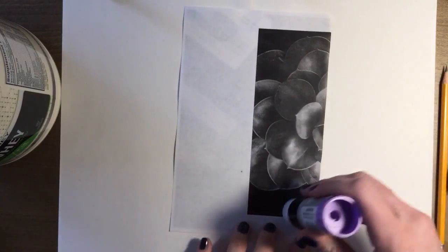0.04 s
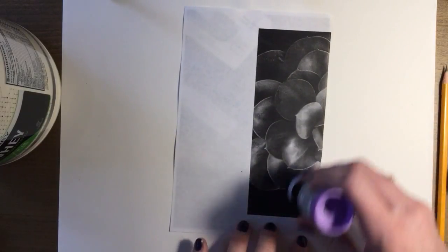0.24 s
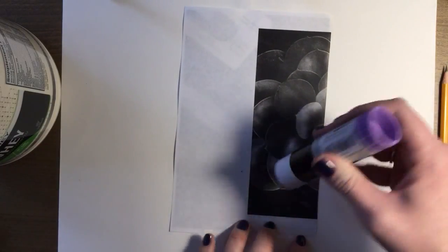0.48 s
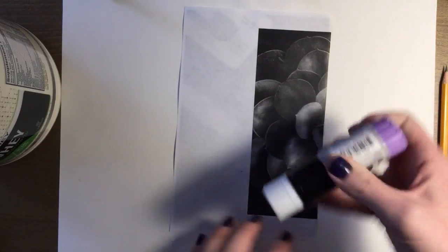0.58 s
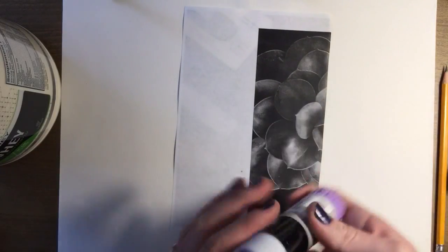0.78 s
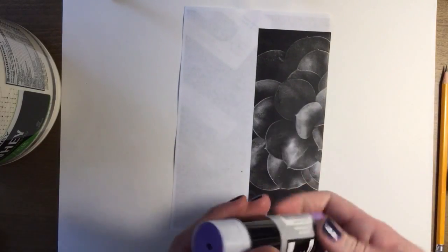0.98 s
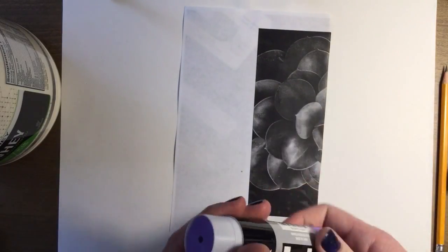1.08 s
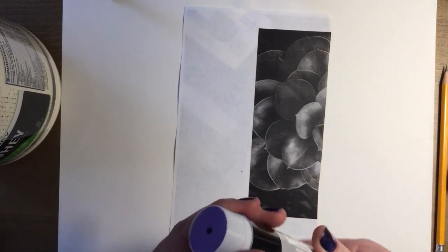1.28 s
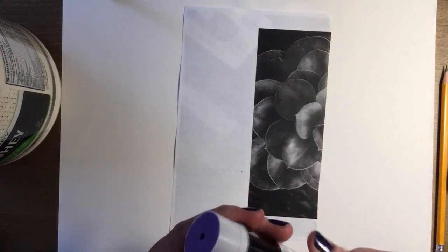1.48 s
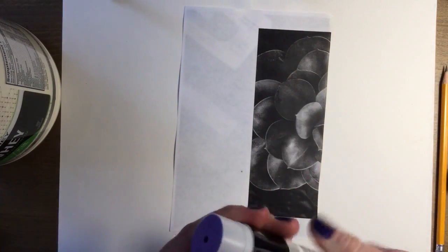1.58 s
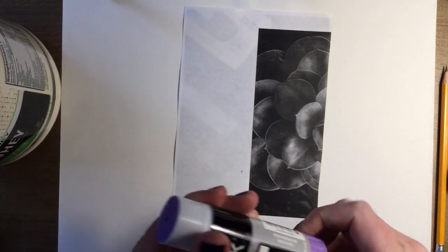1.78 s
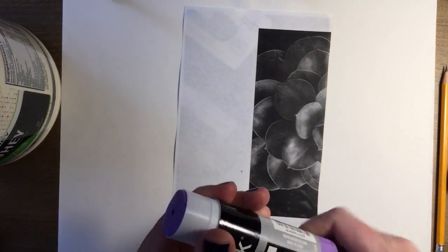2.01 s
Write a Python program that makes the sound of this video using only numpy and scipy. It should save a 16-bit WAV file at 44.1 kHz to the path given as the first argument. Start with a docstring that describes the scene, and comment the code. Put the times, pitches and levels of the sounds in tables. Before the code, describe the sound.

A glue stick bumps a desk and scrapes across paper, followed by faint handling.

```python
"""First comes a soft, dull rub, over the low rumble and mains hum of a quiet room. A glue stick bumps
a desk with a dull thump, then scrapes across a sheet of paper, its friction making the desk top rumble.
Afterwards fingers brush, tick and faintly squeak on the plastic tube as it changes hands."""
import sys
import numpy as np
from scipy import signal
from scipy.fft import rfft, irfft
from scipy.io import wavfile

SR = 44100
rng = np.random.default_rng(int(sys.argv[2]) if len(sys.argv) > 2 else 0)


def store_wav(level_fs):
    """Save 16-bit WAV to argv[1]."""
    pcm = np.round(np.clip(np.atleast_2d(level_fs), -1, 1) * 32767)
    wavfile.write(sys.argv[1], SR, pcm.T.astype(np.int16))


N = 90404
TIME = np.arange(N) / SR

# notes at which the plastic tube rings (pitch [Hz], width [Hz], boost [dB])
TUBE_NOTES = [(3233, 190, 11), (4020, 1300, 3.5), (5000, 150, 8.5)]


def from_db(db):
    """Turn decibels into a number to multiply by."""
    return 10 ** (np.asarray(db) / 20)


def rms_one(x):
    """Scale a sound so that its average strength (rms) is 1."""
    return x / np.sqrt(np.mean(x ** 2) + 1e-20)


def in_time(rows):
    """Join (time, value) rows with straight lines; outside them give -160, which in dB is silence."""
    return np.interp(TIME, *np.transpose(rows), left=-160, right=-160)


def colour(x, tone, tilt_db=0):
    """Shape a sound by (pitch, level) rows, tilted per octave and fading past the ends; strength 1."""
    hz, db = np.transpose(tone)
    octave, points = np.log2(np.fft.rfftfreq(N, 1 / SR) + 1), np.log2(hz)
    outside = np.abs(octave - np.clip(octave, points[0], points[-1]))
    gain_db = np.interp(octave, points, db) + tilt_db * octave - 20 * outside
    return rms_one(irfft(rfft(x) * from_db(gain_db), N))


def grains(per_s, spread_db):
    """Friction: tiny slips of uneven size at random moments."""
    sizes = from_db(spread_db * np.minimum(rng.exponential(1, N), 4))
    return rms_one(sizes * rng.choice([-1, 1], N) * (rng.random(N) < per_s / SR))


def stroke(start, rise, fall):
    """A smooth swell, then a fade of 20 dB every `fall` seconds."""
    age = TIME - start
    swell = np.sin(np.pi / 2 * np.clip(age / rise, 0, 1)) ** 2
    return swell * from_db(-20 * np.maximum(age - rise, 0) / fall)


def ring(x, hz, ring_s):
    """Each push starts a note that fades by 60 dB in ring_s seconds."""
    r, w = np.exp(-np.log(1000) / (ring_s * SR)), 2 * np.pi * hz / SR
    return signal.lfilter([0, np.sin(w)], [1, -2 * r * np.cos(w), r * r], x + 1e-18)


def resonance(x, hz, width_hz):
    """Keep the part of a sound that lies near one pitch."""
    r = np.exp(-np.pi * width_hz / SR)
    poles = [1, -2 * r * np.cos(2 * np.pi * hz / SR), r * r]
    return signal.lfilter(np.array([1, 0, -1]) * (1 - r * r) / 2, poles, x + 1e-18)


def tube(x, notes):
    """A hollow tube adds its own ringing to a contact noise."""
    return x + sum(from_db(db) * resonance(x, hz, width) for hz, width, db in notes)


def scatter(x, decay_s=0.0041, level_db=2):
    """Add quick reflections off the desk and hands close by."""
    tail = rng.standard_normal(N) * np.exp(-TIME / decay_s)
    return x + from_db(level_db) * signal.fftconvolve(x, tail / np.linalg.norm(tail))[:N]


def background(room_db=-60.5, hum_hz=116.7, hum_db=-63):
    """The room's steady low rumble, faint hiss and mains hum."""
    # tone of the room noise (pitch [Hz], relative level [dB])
    room_tone = [(28, -32.5), (45, -9), (75, 0), (150, 1.5), (205, -9.5), (260, -0.5), (340, -17.5),
                 (520, -26.5), (1400, -27.5), (2500, -40), (5000, -48), (15000, -49)]
    hum = from_db(hum_db) * rms_one(np.sin(2 * np.pi * hum_hz * TIME))
    return from_db(room_db) * colour(rng.standard_normal(N), room_tone) + hum


def handling():
    """Hands moving on the desk make a soft rumble."""
    # loudness of the movement (time [s], level [dB])
    movement = [(0, -60.5), (.62, -59.5), (.74, -65.5), (.82, -62.5), (1.15, -63), (1.4, -68.5),
                (1.75, -63), (1.86, -66.5), (2.05, -64)]
    # tone of the rumble (pitch [Hz], relative level [dB])
    rumble_tone = [(50, -9), (270, -5.5), (360, -18), (600, -25)]
    return from_db(in_time(movement)) * colour(grains(800, spread_db=2.5), rumble_tone)


def rubs():
    """Glue or skin rubs with a dull, fine-grained friction."""
    # soft rubs (start [s], rise [s], fall [s], level [dB])
    touches = [(-.02, 0.023, 0.15, -59.5), (.11, 0.029, 0.051, -74.5), (0.203, 0.0043, 0.045, -58.5),
               (0.597, 0.0018, 0.0089, -65.5), (1.764, 0.018, 0.2, -71.5)]
    # tone of a rub (pitch [Hz], relative level [dB])
    rub_tone = [(250, -11), (600, 3.5), (1400, -4), (1900, -11.5), (2600, -22), (7000, -37.5)]
    loudness = sum(from_db(db) * stroke(start, rise, fall) for start, rise, fall, db in touches)
    return loudness * colour(grains(4000, spread_db=-3.5), rub_tone)


def finger_brushes():
    """Fingers brush the tube in short strokes, and the plastic rings along."""
    # brushes (start [s], rise [s], fall [s], level [dB], brightness [dB per octave])
    touches = [(0.049, 0.026, 0.013, -76.5, 8), (0.621, 0.01, 0.081, -81, 4), (.68, 0.018, 0.094, -73, 7),
               (.9, 0.014, 0.03, -79, 23), (1.05, 0.01, 0.02, -82, 14), (1.605, 0.032, 0.059, -78.5, 8.5),
               (1.732, 0.025, 0.045, -70.5, 8), (1.828, .014, 0.019, -75.5, 5)]
    # tone of skin on plastic (pitch [Hz], relative level [dB])
    skin_tone = [(1200, -2), (2000, 18.5), (3200, 4), (6300, -8.5), (9000, -1.5), (15000, -6)]
    friction = scatter(tube(grains(11000, spread_db=7), TUBE_NOTES))
    return sum(from_db(db) * stroke(start, rise, fall) * colour(friction, skin_tone, tilt)
               for start, rise, fall, db, tilt in touches)


def nail_ticks(decay_s=0.00204):
    """Fingernails tap the tube; some taps make the plastic ring."""
    # taps (time [s], level [dB], ring compared with the tap [dB])
    taps = [(0.207, -61, -17.5), (0.5993, -67.5, 10), (.918, -71.5, -2), (1.315, -72, 14.5)]
    out = 0
    for start, db, ring_db in taps:
        burst = rng.uniform(-1, 1, N) * (TIME >= start) * np.exp(-np.abs(TIME - start) / decay_s)
        ringing = from_db(ring_db) * resonance(burst, hz=4870, width_hz=930)
        out = out + from_db(db) * (burst + ringing)
    return out


def thump():
    """The stick bumps the desk, settles and catches on the paper; later the hands nudge the desk."""
    # soft pushes on the desk (time [s], level [dB], contact length [s])
    bumps = [(0.2075, -31, 0.00093), (.212, -34, 0.0022), (.2775, -46, 0.0045), (0.346, -44.5, 0.0022),
             (.427, -49, 0.0041), (.934, -56, .002), (1.262, -57, .0018)]
    force = np.zeros(N)
    for start, db, length in bumps:
        push = np.exp(-np.pi * ((TIME - start - length / 2) / length) ** 2)
        force -= from_db(db) * push / push.sum()
    return desk(force)


def desk(force, thud_hz=374.4, thud_width_hz=61, thud_db=9.5, bend_hz=232, bend_width_hz=173):
    """A pushed desk top rings at its own notes and gives way with a short thud."""
    # notes of the desk top (pitch [Hz], relative level [dB], ring time [s])
    desk_notes = [(87.8, -10.5, .4), (137.6, -12.5, 0.31), (222, -13, 0.24), (280.5, 3, 0.27),
                  (350.3, 2, 0.085), (465, -10.5, .28), (550, 8, 0.025), (618, -0.3, 0.072),
                  (670, -13, 0.18), (792, -9, 0.076)]
    ringing = sum(from_db(db) * ring(force, hz, ring_s) for hz, db, ring_s in desk_notes)
    thud = from_db(thud_db) * ring(force, thud_hz, np.log(1000) / (np.pi * thud_width_hz))
    # bending waves near bend_hz travel slowly, so the low notes arrive a little late
    r = np.exp(-np.pi * bend_width_hz / SR)
    poles = np.array([1, -2 * r * np.cos(2 * np.pi * bend_hz / SR), r * r])
    delayed = signal.lfilter(poles[::-1], poles, ringing + thud)
    # the desk gives off little deep bass
    return signal.sosfilt(signal.butter(3, 98, "high", fs=SR, output="sos"), delayed)


def scrape(rumble_peak_db=-46.5, rumble_follows=0.57, upper_ratio=1.77):
    """Paper fibres hiss under the stick while coarser slips shake the desk and make the stick judder."""
    # loudness of the hiss as the stick presses down (time [s], level [dB])
    pressure = [(.27, -100), (.304, -73.5), (.35, -63), (.392, -69), (.445, -62), (.472, -67),
                (.496, -76.5), (.515, -101)]
    # hollow ringing of the stick on the paper (pitch [Hz], width [Hz], boost [dB])
    stick_notes = [(830, 16, 25.5), (1508, 23, 8.5), (1885, 42, 10), (2227, 71, 6.5), (3420, 280, 0.5),
                   (7820, 240, 1.5)]
    # tone of paper friction (pitch [Hz], relative level [dB])
    paper_tone = [(500, 18), (900, 6.5), (1400, 13.5), (2000, 8), (2800, 1), (6500, 1.5), (15000, 0)]
    # tone of the desk, damped by the pressing hand (pitch [Hz], relative level [dB])
    desk_tone = [(80, -10.5), (205, 4.5), (285, 0), (700, -18)]
    # two notes that shift with the grip (time [s], lower pitch [Hz], lower level [dB], upper level [dB])
    judder_notes = [(.28, 342, -69, -87), (.32, 354.3, -50, -67.5), (0.386, 360, -48.5, -64.5),
                    (.412, 368.7, -64.5, -61.5), (.475, 392, -56.5, -63), (.515, 382, -72, -87)]
    pressure_db = in_time(pressure)
    fibres = scatter(tube(grains(6000, spread_db=3.5), stick_notes))
    hiss = from_db(pressure_db) * colour(fibres, paper_tone)
    rumble_db = rumble_peak_db + rumble_follows * (pressure_db - pressure_db.max())
    rumble = from_db(rumble_db) * colour(grains(1500, spread_db=-1), desk_tone)
    times, *columns = np.transpose(judder_notes)
    hz, lower_db, upper_db = (in_time(np.c_[times, column]) for column in columns)
    shaking = from_db(lower_db) * judder(hz) + from_db(upper_db) * judder(upper_ratio * hz)
    return hand_gap(hiss) + rumble + shaking


def judder(hz, width_hz=37):
    """Random slips shake the gripped stick in a wavering, gliding note."""
    slips = rng.standard_normal(N) + 1j * rng.standard_normal(N)
    sway = signal.sosfilt(signal.butter(2, width_hz / 2, fs=SR, output="sos"), slips)
    evened = sway / np.sqrt(np.abs(sway))  # smaller swings in loudness
    return rms_one(np.real(evened * np.exp(2j * np.pi * np.cumsum(hz) / SR)))


def hand_gap(hiss, width_hz=600, dip_db=8, peak_db=4.5, peak_above_hz=1050):
    """The gap between hand and paper opens, sweeping a dip and a peak above it down through the hiss."""
    # the pitch that the gap weakens (time [s], pitch [Hz])
    dip_path = [(.3, 7100), (.335, 6660), (.46, 3380)]
    hz, times, frames = signal.stft(hiss, SR, nperseg=256)
    offset = hz[:, None] - np.interp(times, *np.transpose(dip_path))
    dip = np.exp(-(offset / width_hz) ** 2)
    peak = np.exp(-((offset - peak_above_hz) / width_hz) ** 2)
    return signal.istft(frames * from_db(peak_db * peak - dip_db * dip), SR)[1][:N]


def palm_slide():
    """The tube slides through the palm with a long, faint hiss."""
    # loudness of the slide (time [s], level [dB])
    slide = [(.6, -100), (.74, -80), (1.02, -80), (1.3, -84), (1.42, -93), (1.68, -79.5), (1.85, -102),
             (2.05, -91)]
    # tone of the palm on plastic (pitch [Hz], relative level [dB])
    palm_tone = [(800, -3.5), (1650, 7.5), (2600, 0.5), (5400, -6), (7000, -11.5), (9300, -11),
                 (15000, -14)]
    return from_db(in_time(slide)) * colour(scatter(grains(16000, spread_db=3)), palm_tone)


def grip(level_db=-78):
    """Fingertips take hold, and a short run of slips rings the plastic."""
    slips = grains(2500, spread_db=-2)
    ringing = rms_one(tube(slips, TUBE_NOTES) - slips)
    return from_db(level_db) * stroke(start=.693, rise=.01, fall=.028) * ringing


def squeaks():
    """Skin dragging on plastic makes thin, high whistles."""
    # whistles (start [s], rise [s], fall [s], pitch [Hz], width [Hz], level [dB])
    whistles = [(.95, 0.048, 0.038, 8900, 1400, -83.5), (1.85, 0.084, 0.42, 12270, 855, -85.5)]
    drag = rng.standard_normal(N)
    out = 0
    for start, rise, fall, hz, width, db in whistles:
        whistle = rms_one(resonance(resonance(drag, hz, width), hz, width))
        out = out + from_db(db) * stroke(start, rise, fall) * whistle
    return out


def wall_echo(x, ring_s=0.39, dull_above_hz=920, gain_db=-13.5):
    """The walls of the small room send back a short, dull wash of sound."""
    tail = rng.standard_normal(N) * np.exp(-np.log(1000) * TIME / ring_s) * (TIME > .008)
    echo = signal.fftconvolve(x, tail / np.linalg.norm(tail))[:N]
    return from_db(gain_db) * signal.sosfilt(signal.butter(1, dull_above_hz, fs=SR, output="sos"), echo)


def scene():
    """Mix the desk and hand sounds with the room, in one channel."""
    near = thump() + scrape() + rubs() + finger_brushes() + palm_slide()
    near += grip() + squeaks() + nail_ticks()
    return (near + wall_echo(near) + handling() + background())[None]


def record(dry):
    """Cut away the very highest treble."""
    cutoff_hz = 15450
    return signal.sosfilt(signal.ellip(12, .1, 70, cutoff_hz, fs=SR, output="sos"), dry)


dry = scene()
out = record(dry)
store_wav(out)
```